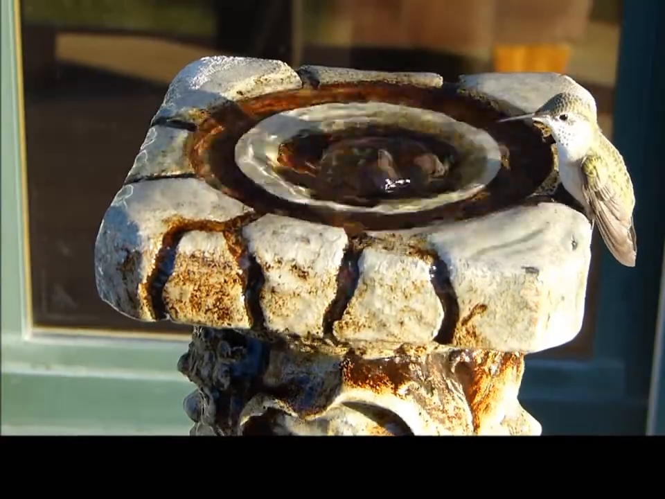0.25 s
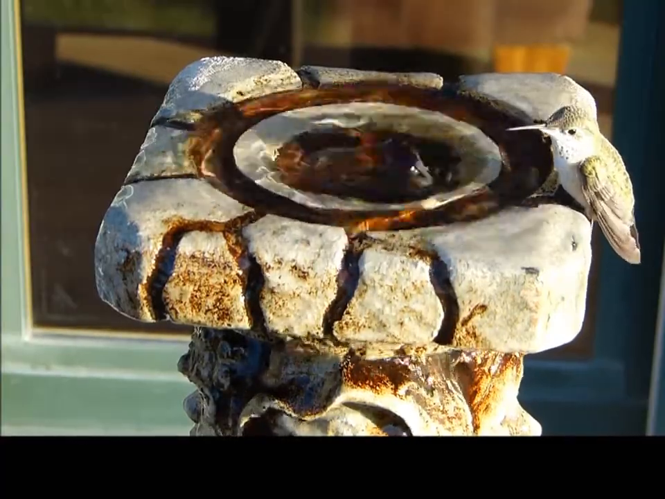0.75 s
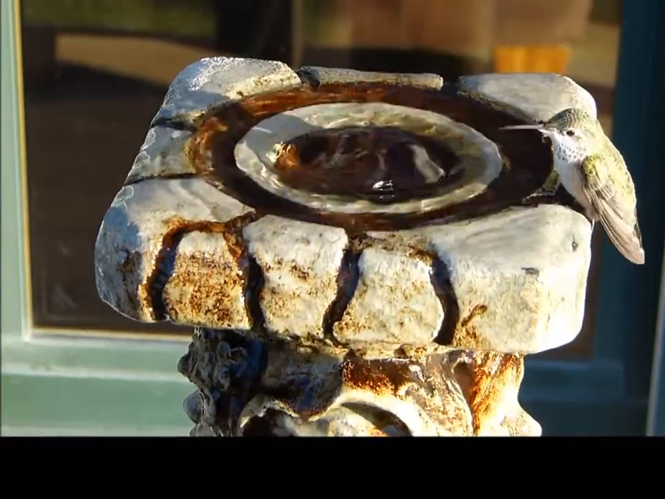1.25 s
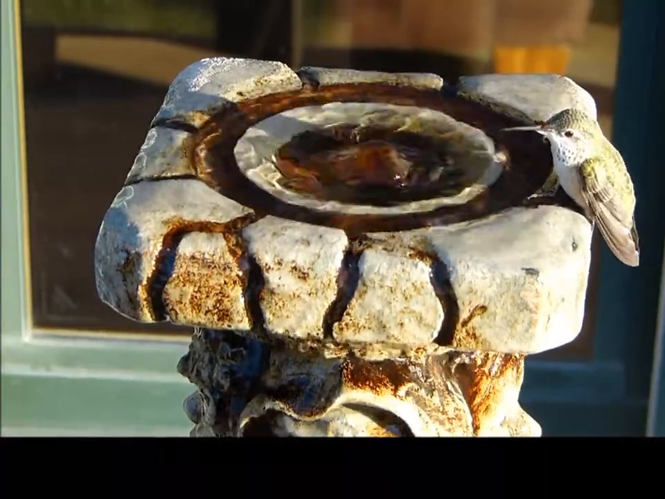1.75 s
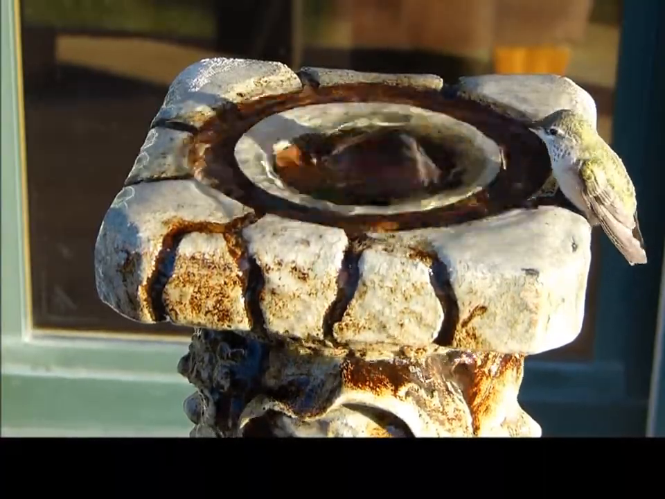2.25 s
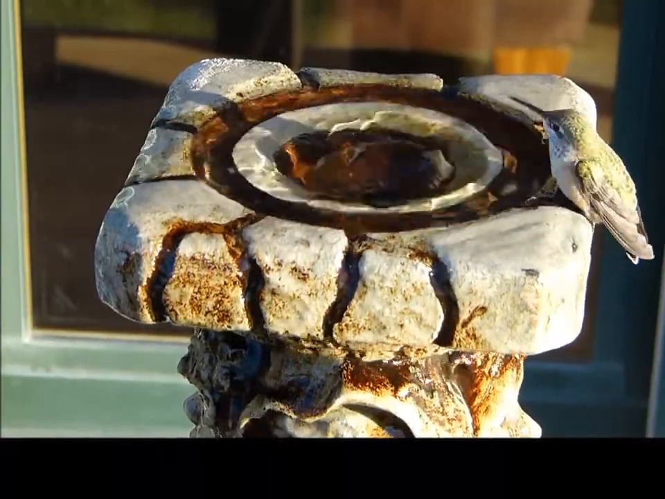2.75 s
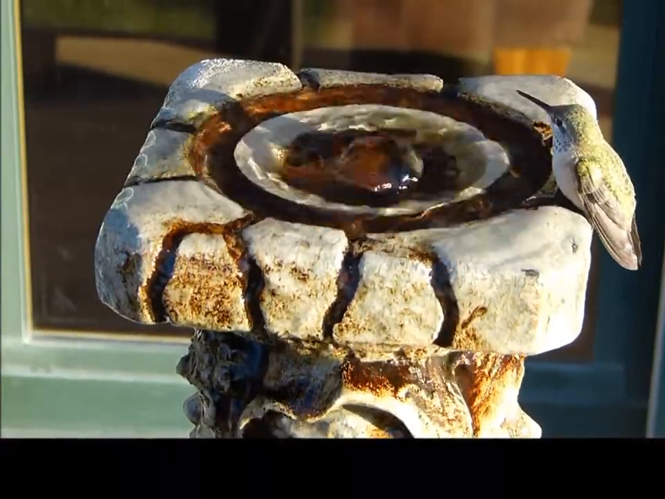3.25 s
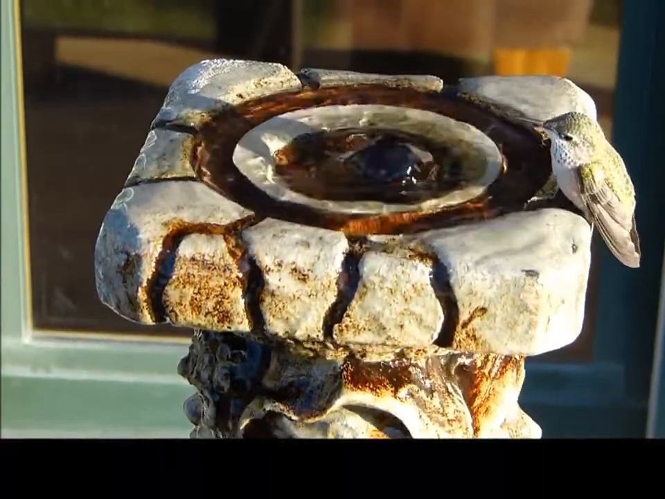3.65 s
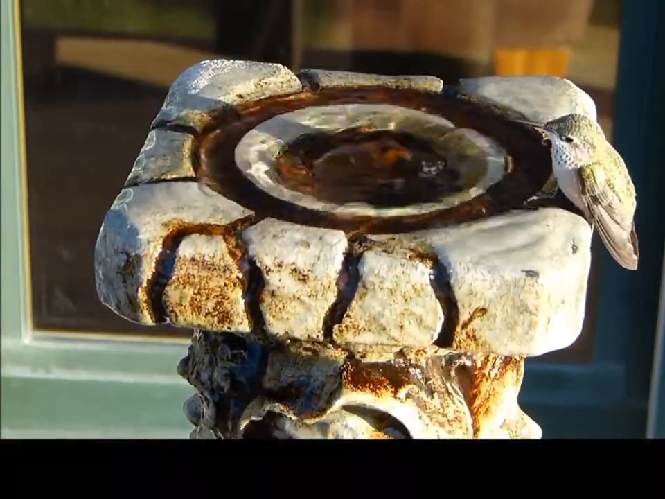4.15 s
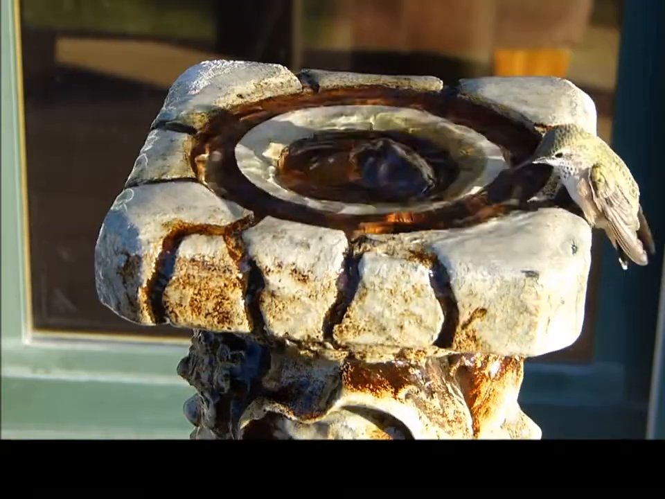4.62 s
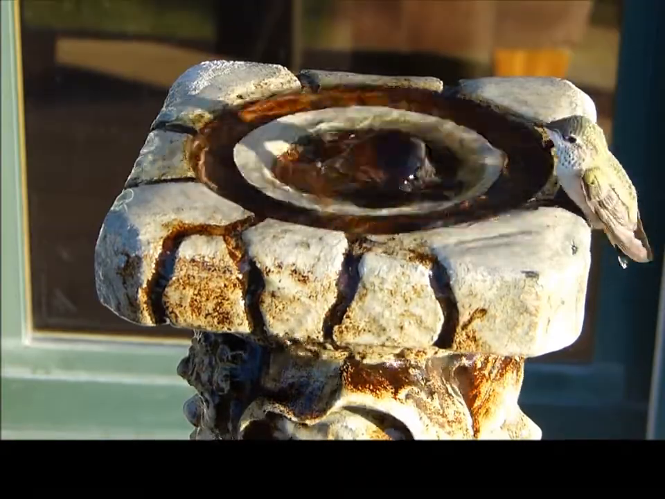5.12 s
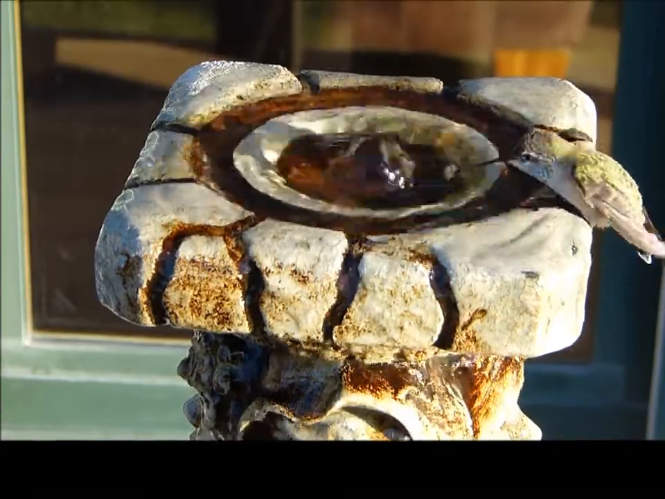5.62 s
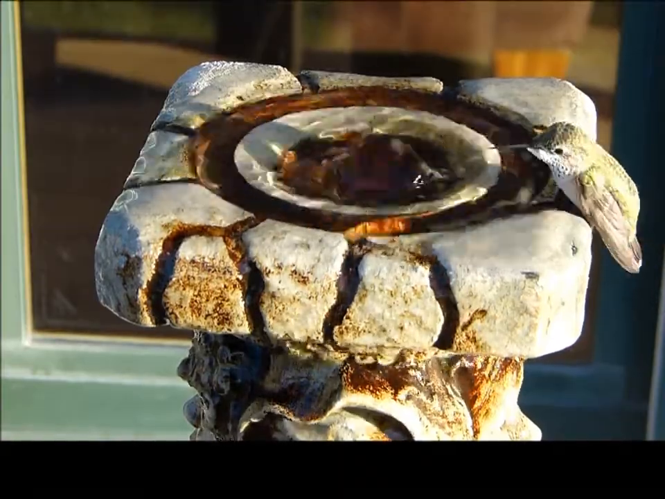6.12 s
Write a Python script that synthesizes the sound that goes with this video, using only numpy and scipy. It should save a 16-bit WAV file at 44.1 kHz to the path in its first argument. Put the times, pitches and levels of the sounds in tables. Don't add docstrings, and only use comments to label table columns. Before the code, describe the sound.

Quiet garden fountain drips and plips while a tiny nearby bird twitters shrilly twice; soft air wash, leaf rustle and faint distant birdsong.

```python
import sys
import numpy as np
from scipy import signal
from scipy.fft import rfft, irfft, next_fast_len
from scipy.io import wavfile
from scipy.ndimage import uniform_filter1d

SR = 44100
rng = np.random.default_rng(int(sys.argv[2]) if len(sys.argv) > 2 else 0)


def gain_from_decibels(decibels):
    exponent = np.asarray(decibels, float) / 20
    return 10 ** exponent


def generate_wav(signal):
    frames = np.transpose(np.atleast_2d(signal))
    scaled = np.clip(frames, -1, 1) * 32767
    pcm = np.round(scaled).astype(np.int16)
    wavfile.write(sys.argv[1], SR, pcm)


N = 281446
TIME = np.arange(N) / SR


def evened(x):
    return x / np.sqrt(np.mean(np.abs(x) ** 2) + 1e-20)


def read(points, hz):
    f, value = np.transpose(points)
    return np.interp(np.log(hz + 1), np.log(f + 1), value)


def add(mix, s, sound, pan_db):
    part = mix[:, round(s * SR):][:, :len(sound)]
    part += gain_from_decibels(np.array([[.5], [-.5]]) * pan_db) * sound[:part.shape[1]]


def wander(hz, channels):
    a, b = rng.standard_normal((2, channels, N))
    r = np.exp(-np.pi * hz / SR)
    smooth = signal.lfilter([1], [1, -r], a + 1j * b)
    return evened(signal.lfilter([1], [1, -r], smooth))


def noise(tone, patchy_db, channels):
    frames, hz = N // 256 + 5, np.fft.rfftfreq(1024, 1 / SR)
    a, b, patches = rng.standard_normal((3, channels, 513, frames))
    across_pitch = uniform_filter1d(patches[0], 10, axis=0)
    patches = evened(uniform_filter1d(across_pitch, 12, axis=1))
    z = (a + 1j * b) * gain_from_decibels(read(tone, hz)[:, None] + patchy_db * patches)
    return evened(signal.istft(z, nperseg=1024, noverlap=768)[1][:, :N])


def garden(x, walls_db, walls_t60):
    hedges_t60 = .45
    t = np.arange(SR // 2) / SR
    fade = gain_from_decibels(-60 * t / hedges_t60) + gain_from_decibels(walls_db - 60 * t / walls_t60)
    taps = rng.choice([-1., 1.], (2, len(t))) * (rng.random((2, len(t))) < .12) * (t > .002)
    taps = signal.lfilter([1], [1, -.3], taps * fade)
    return signal.fftconvolve(x.mean(0)[None], taps / np.linalg.norm(taps[0]), axes=1)[:, :N]


def whistles(notes):
    out = np.zeros((2, N))
    for s, length, from_hz, to_hz, db, pan_db in notes:
        hz = np.geomspace(from_hz, to_hz, round(length * SR))
        tone = np.sqrt(2) * np.cos(2 * np.pi * np.cumsum(hz) / SR)
        add(out, s, gain_from_decibels(db) * tone * signal.windows.tukey(len(hz), .5), pan_db)
    return out * evened(1 + .3 * wander(450, 2).real)


def bursts(rows, span):
    out = np.zeros((2, N))
    for s, length, low_hz, db, pan_db in rows:
        band = signal.butter(3, [low_hz, low_hz * span], "band", fs=SR)
        burst = signal.lfilter(*band, rng.standard_normal(2800))[:round(length * SR)]
        add(out, s, gain_from_decibels(db) * evened(burst) * signal.windows.tukey(len(burst), .4), pan_db)
    return out


def syrinx_half(voice):
    attack_s, release_s, rasp, rasp_hz = 0.0023, 0.0033, .2, 300
    s, pitch_hz, db = np.transpose(voice)
    hz = np.interp(TIME, s, pitch_hz)
    edges = np.clip(np.minimum((TIME - s[0]) / attack_s, (s[-1] - TIME) / release_s), 0, 1)
    flicker = 1 + rasp * wander(rasp_hz, 1).real
    loud = np.sqrt(2) * gain_from_decibels(np.interp(TIME, s, db)) * edges * flicker
    return hz, np.exp(2j * np.pi * np.cumsum(hz) / SR), loud


# delay/ms, gain
LEFT_PATHS = [(0.0, -0.79), (1.44, -0.13), (2.556, -0.1), (2.565, 0.32), (3.123, -0.16), (3.384, -0.32),
              (3.627, -0.25), (3.978, -0.1), (4.23, -0.16), (4.626, -0.1), (6.453, 0.13), (6.993, 0.1)]
RIGHT_PATHS = [(0.009, -0.13), (0.09, 0.32), (0.387, 0.1), (1.449, -0.1), (2.574, 0.16), (3.042, 0.13),
               (3.384, -0.16), (3.447, -0.13), (3.897, 0.1), (4.41, -0.1), (4.806, -0.1), (6.543, -0.1)]


def paths(x):
    size = next_fast_len(N + 2048)
    hz, ports = np.fft.rfftfreq(size, 1 / SR), []
    place, sign = rng.random(8), rng.choice([-1., 1.], 8)
    for early in (LEFT_PATHS, RIGHT_PATHS):
        late_ms = 7.5 + (16 - 7.5) * place + rng.uniform(0, 0.044, 8)
        late_gain = sign * gain_from_decibels(-17.5 - 9.8 * place) * np.linalg.norm(np.transpose(early)[1])
        arrivals = [*early, *zip(late_ms, late_gain)]
        ports.append(sum(g * np.exp(-2j * np.pi * hz * ms / 1000) for ms, g in arrivals))
    return irfft(rfft(x, size) * np.array(ports), size)[:, :N]


# t/s, f/Hz, level/dB
VOICE_GLIDES = [
    [(1.451, 6800, -36.5), (1.464, 6050, -30.5), (1.488, 5840, -28), (1.503, 5510, -31.5),
     (1.52, 5030, -25.5), (1.545, 4636, -28), (1.574, 4340, -35), (1.586, 4190, -47)],
    [(1.416, 9580, -67), (1.44, 9340, -45), (1.451, 8730, -49), (1.458, 7800, -42.5), (1.5, 7430, -38),
     (1.525, 6760, -31), (1.55, 6330, -32), (1.574, 6150, -39), (1.588, 5930, -55)],
    [(4.894, 8040, -64), (4.915, 6800, -38), (4.929, 6610, -58), (4.94, 6460, -32.5), (4.975, 6020, -35),
     (5.004, 5590, -37.5), (5.018, 5097, -30.5), (5.052, 4700, -34), (5.09, 4290, -54)],
    [(4.957, 9600, -61.9), (4.97, 8860, -51), (4.995, 8550, -41.5), (5.01, 8600, -50), (5.028, 7440, -48.5),
     (5.047, 6910, -47.5), (5.086, 6690, -51)],
]
# low octave level/dB, low + high level/dB,
# 2 high - low level/dB
EXTRA_TONES = [
    (-23.5, -21, -43),
    (-14.5, -38, -23),
]
# f/Hz, level/dB
BEAK_CURVE = [(7000, 52), (9000, -2), (11000, -5.5), (12500, -15), (13800, -29)]


def twitters():
    out, breath = np.zeros((2, N)), gain_from_decibels(-24.5)
    for k, (octave_db, sum_db, upper_db) in enumerate(EXTRA_TONES):
        f, low, a = syrinx_half(VOICE_GLIDES[2 * k])
        g, high, b = syrinx_half(VOICE_GLIDES[2 * k + 1])
        effort_a, effort_b = (uniform_filter1d(abs(v), 900, axis=1) * (abs(v) > 0) for v in (a, b))
        both = np.sqrt(effort_a * effort_b)
        out += (low * (a + breath * effort_a * wander(1300, 2))).real
        out += (high * (b + breath * effort_b * wander(1300, 2))).real
        octave = gain_from_decibels(octave_db + read(BEAK_CURVE, 2 * f)) * effort_a * low ** 2
        out += (octave * (0.21 + 1.04 * wander(330, 2))).real
        sum_tone = gain_from_decibels(sum_db + read(BEAK_CURVE, f + g)) * both * low * high
        out += (sum_tone * wander(350, 2)).real
        upper = gain_from_decibels(upper_db + read(BEAK_CURVE, 2 * g - f)) * both * high ** 2 / low
        out += (upper * wander(350, 2)).real
    out = paths(out)
    return out + gain_from_decibels(-11.5) * garden(out, walls_db=21, walls_t60=.12)


# t/s, length/s, from f/Hz, to f/Hz, level/dB
CHIP_STROKES = [
    (1.457, .005, 10000, 9000, -66),
    (2.622, 0.011, 6680, 4000, -53),
    (2.631, 0.0095, 4220, 2730, -64),
    (2.629, 0.0039, 6600, 4800, -42),
    (2.6295, 0.0057, 12300, 9500, -59),
    (2.6317, .011, 10170, 5630, -48.5),
    (2.655, 0.009, 4640, 5240, -71),
]


def chip():
    return whistles([(*row, 1) for row in CHIP_STROKES])


# delay/ms, level/dB
STONE_ECHOES = [(.7, -14), (3.5, -4), (4.6, -12), (6.8, -10), (8.1, -14), (11.8, -12), (17.5, -18)]


def near_echoes(x):
    taps = np.zeros((2, 1024))
    taps[:, 0] = 1
    for ms, db in STONE_ECHOES:
        place = (ms * SR / 1000 + rng.uniform(0, 12, 2)).astype(int)
        taps[[0, 1], place] = gain_from_decibels(db) * rng.choice([-1, 1])
    return signal.oaconvolve(x, taps / np.linalg.norm(taps[0]), axes=1)[:, :N]


# t/s, peak level/dB, bubble f/Hz, pan/dB
WATER_DROPS = [(0.0894, -62, 6940, 7), (0.386, -42.5, 2720, -2), (0.432, -41.5, 3920, -1.0),
               (0.624, -53, 2900, -9), (1.06, -55, 7100, 1.0), (1.0994, -58, 6940, 0.0),
               (1.918, -51.5, 5170, -9), (2.0167, -56, 7050, -0.5), (2.4522, -57, 2530, 11),
               (3.7694, -60, 5390, -3), (4.031, -60, 4200, 12), (4.0997, -56, 3100, -6),
               (4.1144, -50.5, 6430, 3.0), (4.137, -54, 4200, 2), (4.173, -55, 5060, 2),
               (4.1844, -68, 6500, 1.0), (4.215, -59, 2150, -2), (4.747, -53, 4320, 3.5),
               (6.3568, -56, 7350, 12)]
# t/s, peak level/dB, bubble f/Hz, pan/dB
HARD_DROPS = [
    (0.611, -55, 2800, 8),
    (2.766, -48.5, 4200, -1),
    (4.0636, -52, 2820, -3),
    (4.209, -56, 4100, -2),
    (4.8563, -52, 4930, 4),
    (6.2494, -53.5, 5700, 1.5),
]


def drops():
    out, t = np.zeros((2, N)), np.arange(2000) / SR
    rows = [(*row, -8) for row in WATER_DROPS] + [(*row, 0.5) for row in HARD_DROPS]
    for s, db, hz, pan_db, slap_db in rows:
        ring = np.sin(2 * np.pi * hz * (.95 * t + 12 * t ** 2))
        bubble = ring * gain_from_decibels(-60 * t / 0.031) * (1 - np.exp(-t / 0.00013))
        plunge_hz = hz + (8500 - hz) * np.exp(-t / 0.00059)
        slap = np.sin(2 * np.pi * np.cumsum(plunge_hz) / SR)
        slap = slap * np.exp(-t / 0.00071) * (1 - np.exp(-t / 0.00025))
        add(out, s, gain_from_decibels(db - 0.5) * (bubble + gain_from_decibels(slap_db) * 3 * slap), pan_db)
    return near_echoes(out)


# t/s, length/s, low f/Hz, level/dB, pan/dB
SPRAY = [
    (0.033, 0.035, 870, -70, 8),
    (0.08, 0.0092, 960, -63, 9),
    (1.616, .03, 220, -65.5, 2),
    (1.913, 0.012, 2780, -62.5, -11),
    (2.639, 0.01, 2800, -56, 0),
    (4.03, 0.01, 2700, -66.5, -25),
    (6.24, 0.023, 3480, -64.5, 5),
]


def splashes():
    return bursts(SPRAY, span=2.7)


# t/s, length/s, low f/Hz, level/dB, pan/dB
WING_FLICKS = [
    (.615, 0.015, 6000, -68.5, 2),
    (4.065, 0.012, 6200, -68, 2),
    (4.51, 0.049, 6000, -70, 2),
    (4.54, 0.0039, 6500, -69, 15),
    (4.70, 0.05, 3640, -68, 0),
    (4.742, 0.018, 3550, -62, 5),
    (4.77, 0.065, 3650, -67.5, 9),
    (5.019, 0.069, 7000, -62, 5),
    (6.357, .014, 6700, -69, 11),
]


def wing_flicks():
    return bursts(WING_FLICKS, span=1.36)


# t/s, f/Hz, level/dB
BIG_BUBBLES = [
    (0.036, 673, -66.5),
    (0.85, 770, -65),
    (.885, 937, -65.5),
    (1.36, 1070, -72),
    (1.89, 765, -63),
    (4.035, 953, -67.5),
    (4.312, 944, -56.5),
    (5.745, 1534, -67.5),
]


def gurgles():
    return whistles([(s, 0.0236, hz, hz * 1.105, db, 10) for s, hz, db in BIG_BUBBLES])


# t/s, length/s, from f/Hz, level/dB
UP_CALLS = [
    (0.623, 0.026, 2650, -67),
    (0.956, 0.034, 2610, -69),
    (1.33, 0.028, 2560, -70),
    (3.232, 0.016, 2720, -64),
    (3.598, 0.0064, 2660, -60.5),
    (5.41, 0.016, 2640, -70),
]
# t/s, length/s, from f/Hz, level/dB
DOWN_CALLS = [
    (1.594, 0.032, 2840, -67.5),
    (3.249, .035, 3700, -73),
    (3.307, 0.023, 3050, -67.5),
]


def low_far_bird():
    up = [(s, length, hz, hz * 1.27, db, 4.5) for s, length, hz, db in UP_CALLS]
    down = [(s, length, hz, hz * .88, db, 4.5) for s, length, hz, db in DOWN_CALLS]
    return whistles(up + down)


# t/s, length/s, from f/Hz, to f/Hz, level/dB
PHRASE = [(4.256, 0.017, 5000, 5150, -69), (4.303, .015, 6600, 6550, -71), (4.309, .032, 5200, 3790, -69),
          (4.413, 0.04, 5270, 3700, -66), (4.562, 0.022, 4700, 4730, -71), (4.588, 0.023, 5900, 5560, -68),
          (4.646, 0.051, 5100, 3500, -70), (4.807, 0.052, 6300, 5370, -69),
          (4.906, 0.078, 4120, 5800, -66.5), (5.03, .02, 4500, 4000, -70),
          (5.145, 0.075, 4220, 5900, -71.5), (5.24, 0.041, 5560, 3800, -71),
          (5.413, 0.018, 5700, 4800, -70), (5.43, 0.017, 4920, 5540, -67.5),
          (5.446, 0.018, 5380, 4400, -70)]
# t/s, level/dB
TRILL_STARTS = [
    (4.353, -67),
    (4.464, -64.5),
]


def far_songbird():
    pan_db, gap_s, note_s = -10, 0.012, 0.0058
    song = [(*row, pan_db) for row in PHRASE]
    trills = [(s + k * gap_s, note_s, 5950, 4500, db, pan_db) for s, db in TRILL_STARTS for k in range(3)]
    return whistles(song + trills)


# peak t/s, level/dB, hold/s, fade/dB per s
GUST_PEAKS = [
    (0, -62, .01, 26),
    (2.7, -76, .05, 22),
    (4.078, -65, .01, 14),
    (4.47, -65, 0.079, 150),
    (4.75, -62, 0.042, 81),
    (4.85, -67.5, .05, 17),
    (5.99, -72, 0.0091, 80),
    (6.38, -67, .01, 30),
]


def gusts():
    power = gain_from_decibels(-73) ** 2
    for s, db, hold, fade in GUST_PEAKS:
        rising = 190 * np.maximum(s - TIME, 0)
        fading = fade * np.maximum(TIME - s - hold, 0)
        power = power + gain_from_decibels(db - rising - fading) ** 2
    return np.sqrt(power)


# f/Hz, level/dB per Hz
RUSTLE_COLOUR = [(800, -0.5), (1800, -2.5), (3000, -6), (4200, -1.5), (5800, -0.5), (7500, -2.5),
                 (10000, -8.5), (14000, -25)]


def rustle():
    a, b = noise(RUSTLE_COLOUR, 1.26, channels=2)
    flutter = evened(0.87 + abs(wander(110, 1)[0]) ** 0.86)
    return gusts() * flutter * np.array([a, 0.34 * a + 0.74 * b])


# t/s, level/dB
PUMP_LEVEL = [(0.1, -64.5), (0.66, -67), (1.06, -63), (1.76, -72.5), (1.99, -64), (2.83, -62),
              (2.91, -68.5), (3.46, -67.5), (3.55, -96), (3.7, -58), (3.8, -69.5), (4.41, -62.5),
              (4.87, -68), (4.94, -56), (5.21, -68.5), (6.08, -70), (6.17, -61), (6.38, -89)]


def pump():
    drone_hz, rattle_hz = 145.8, 182.5
    drone = gain_from_decibels(np.interp(TIME, *np.transpose(PUMP_LEVEL))) * (0.86 + 0.55 * wander(29, 1)[0])
    drone = drone * np.exp(2j * np.pi * drone_hz * TIME)
    rattle = gain_from_decibels(-73.5) * wander(16.5, 1)[0] * np.exp(2j * np.pi * rattle_hz * TIME)
    return (drone + rattle).real * gain_from_decibels(np.array([[.5], [-.4]]))


# t/s, f/Hz, level/dB
MOTOR_GLIDE = [
    (5.2, 203.6, -85),
    (5.399, 238, -74),
    (5.65, 220.5, -76),
    (5.9, 242.6, -75),
    (6.38, 220, -71),
]


def far_motor():
    s, hz, db = np.transpose(MOTOR_GLIDE)
    turn = np.sin(2 * np.pi * np.cumsum(np.interp(TIME, s, hz)) / SR)
    return np.sqrt(2) * gain_from_decibels(np.interp(TIME, s, db)) * turn


# f/Hz, level/dB per Hz
SHARED_AIR = [(12, -46), (20, 10), (112, -35.5), (129, -1.5), (148, -9), (297, -8.5), (414, -8.5),
              (476, -10), (763, -9.5), (1570, -15.5), (2520, -21), (2900, -20), (3720, -22.5), (8570, -23),
              (15400, -31)]
# f/Hz, level/dB per Hz
OPPOSED_AIR = [(12, -50), (20, -18), (165, -8.5), (273, -1), (360, -3.5), (403, -1), (785, -2.5),
               (1040, -7), (1410, -9), (2450, -16.5), (2900, -17.5), (11600, -29.5), (15400, -36.5)]


def air():
    mid = gain_from_decibels(-63.5) * noise(SHARED_AIR, 0.97, channels=1)[0]
    side = gain_from_decibels(-61) * noise(OPPOSED_AIR, 0.97, channels=1)[0]
    return gain_from_decibels(np.array([[.3], [-.3]])) * np.array([mid + side, mid - side])


def scene():
    calls = chip() + gurgles() + low_far_bird() + far_songbird()
    water = drops() + splashes() + wing_flicks()
    wet = garden(gain_from_decibels(-1) * calls + gain_from_decibels(-23) * water, walls_db=22, walls_t60=.06)
    return twitters() + calls + water + wet + rustle() + pump() + far_motor() + air()


def top_cut(x):
    return signal.sosfilt(signal.butter(12, 15520, fs=SR, output="sos"), x)


def record(dry):
    edge = signal.firwin(255, 15400, window=("kaiser", 8), fs=SR)
    mix = signal.oaconvolve(dry, edge[None], "same", axes=1)
    return top_cut(mix)


dry = scene()
out = record(dry)
generate_wav(out)
```